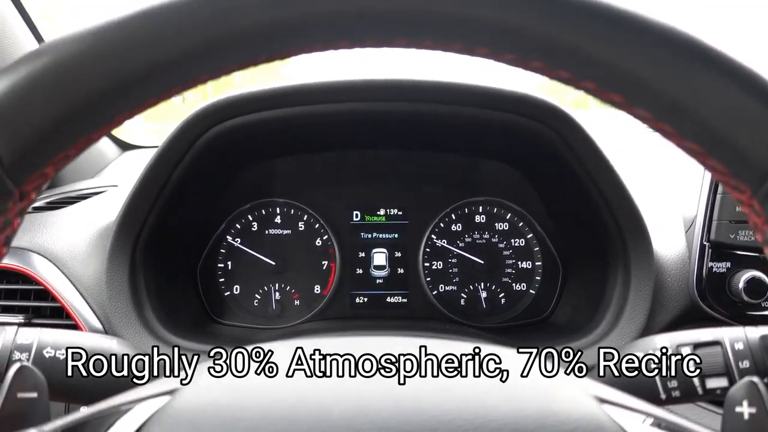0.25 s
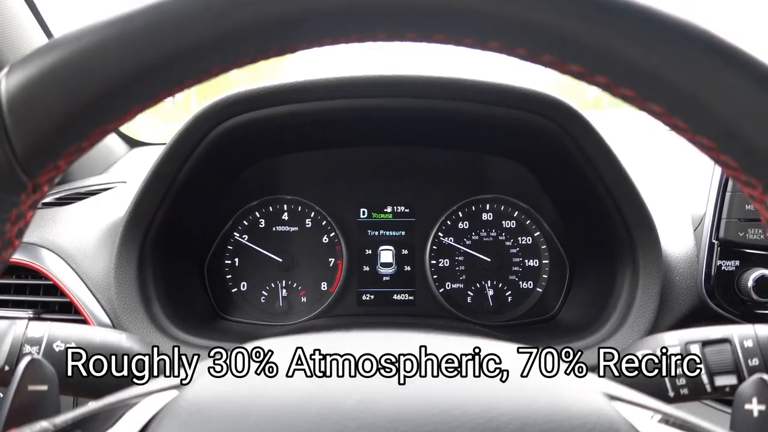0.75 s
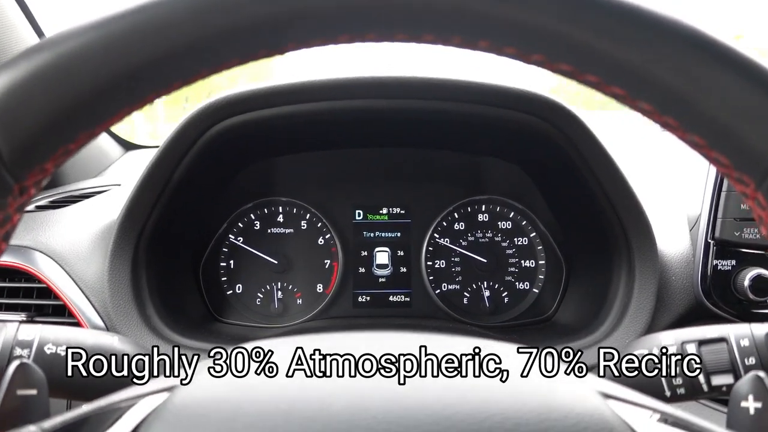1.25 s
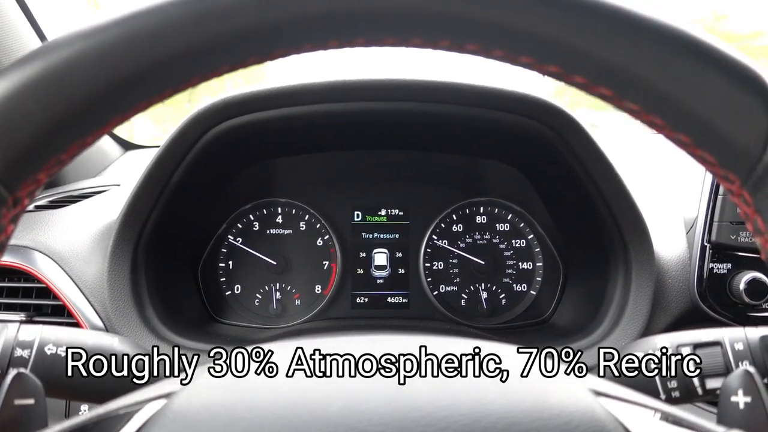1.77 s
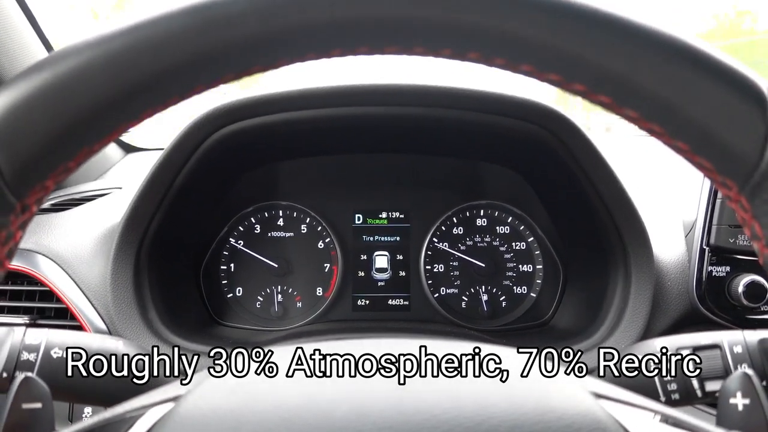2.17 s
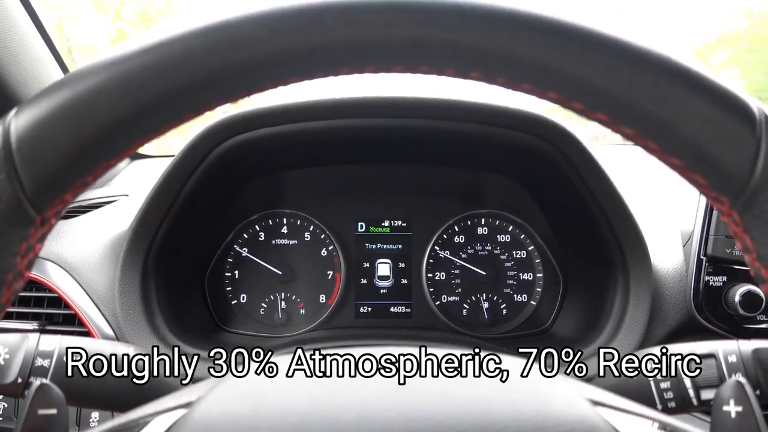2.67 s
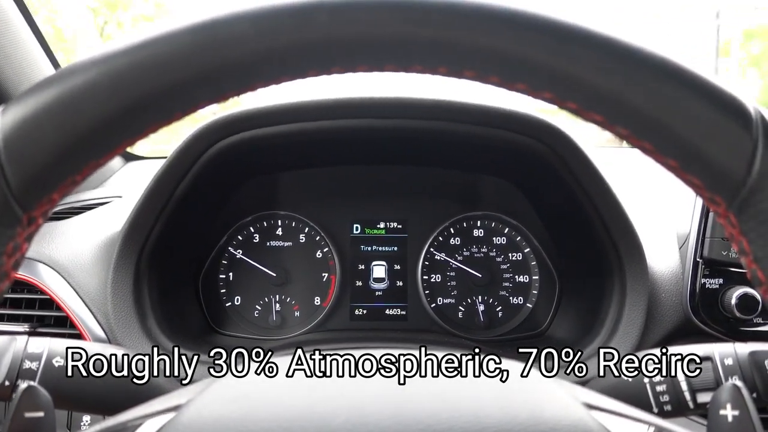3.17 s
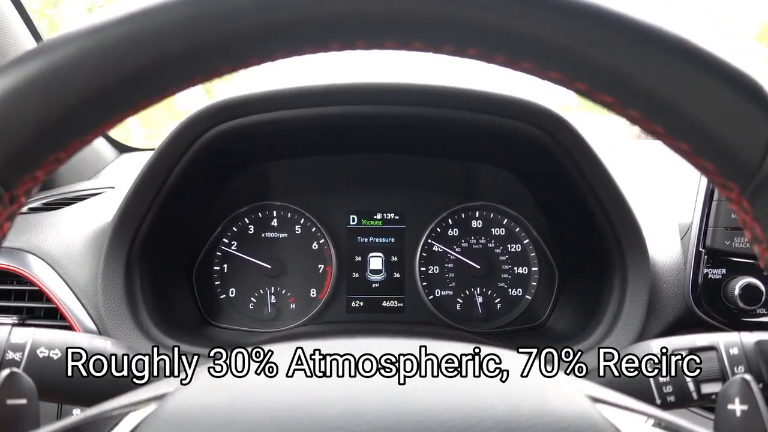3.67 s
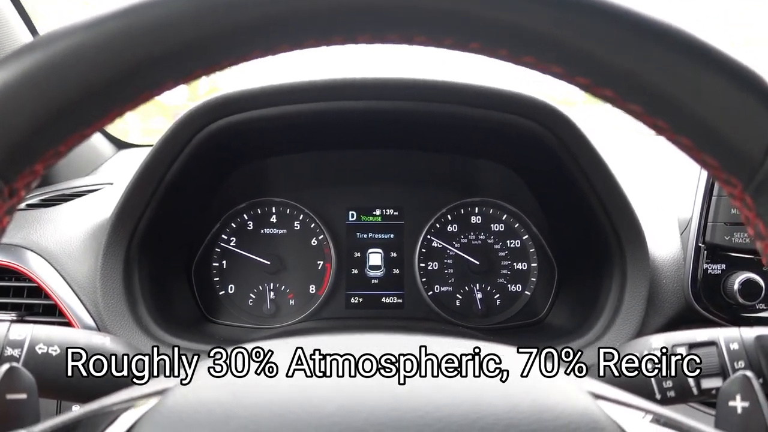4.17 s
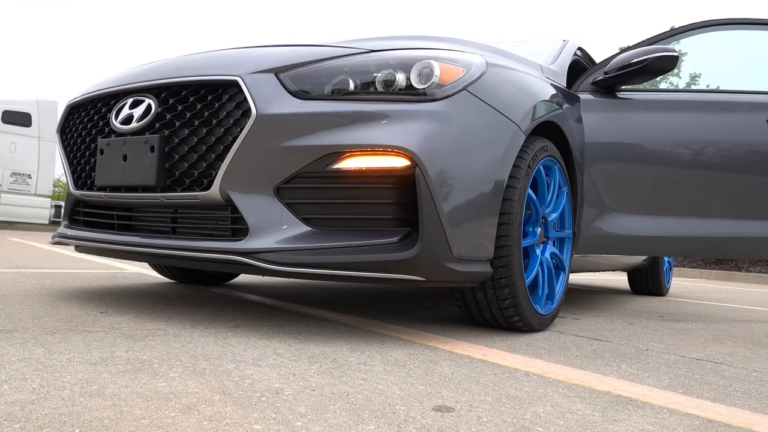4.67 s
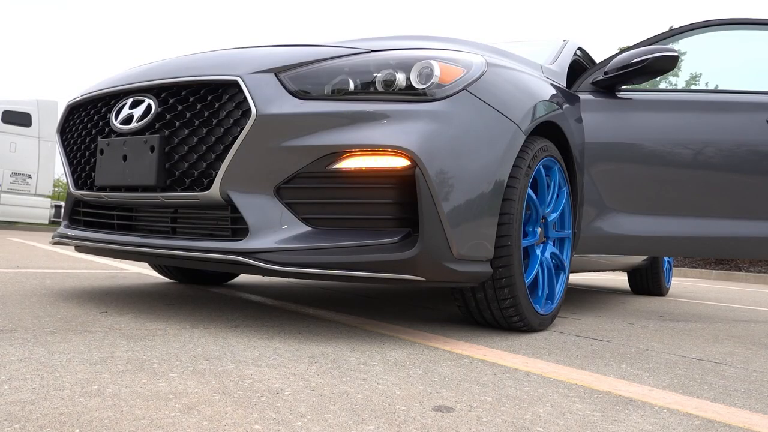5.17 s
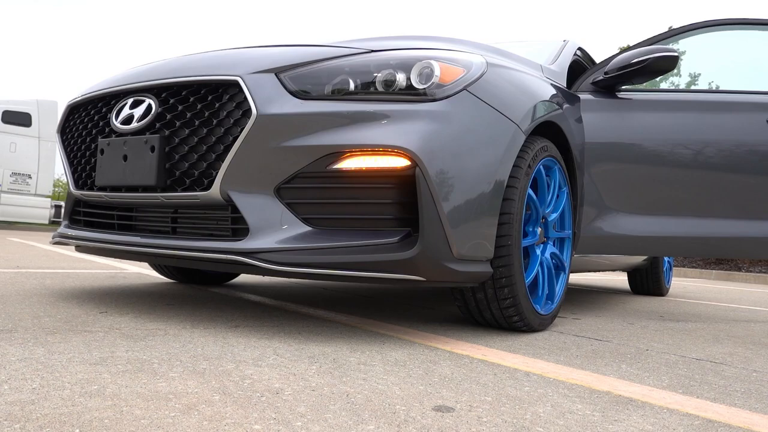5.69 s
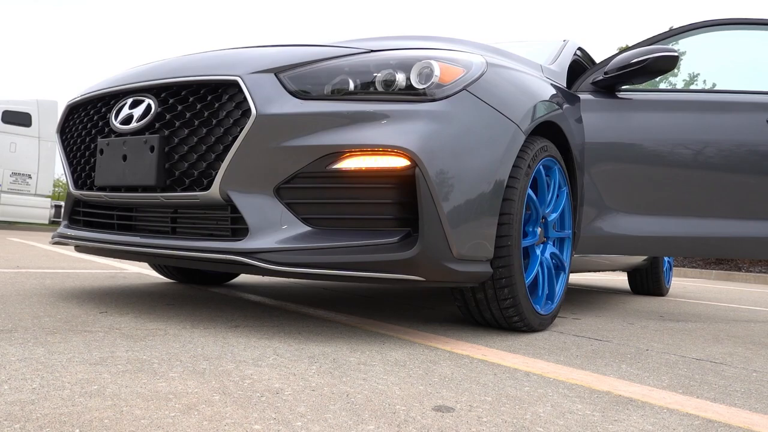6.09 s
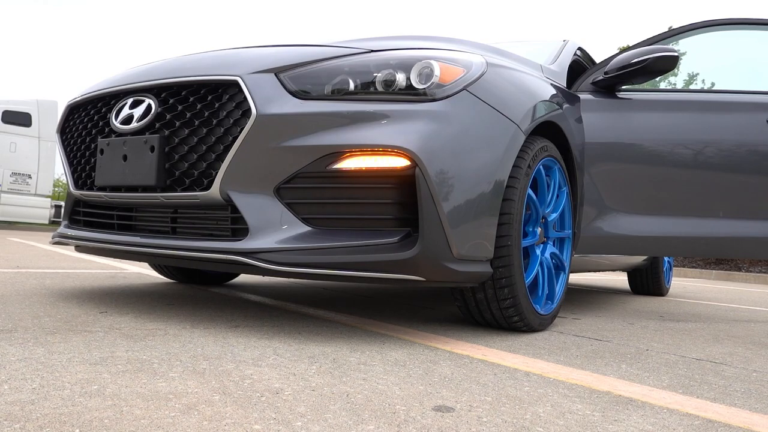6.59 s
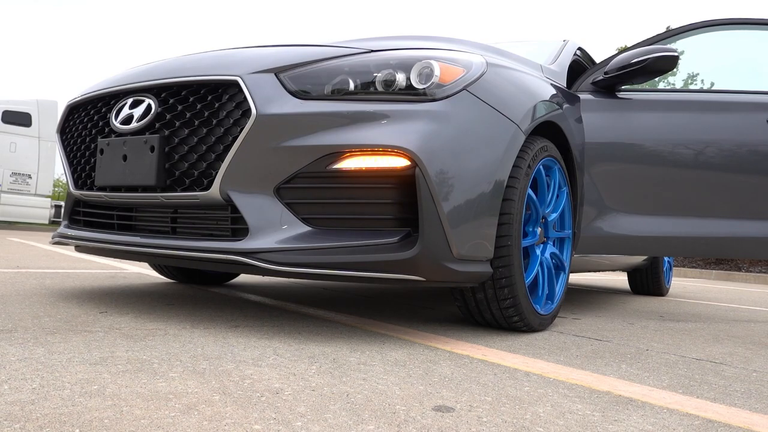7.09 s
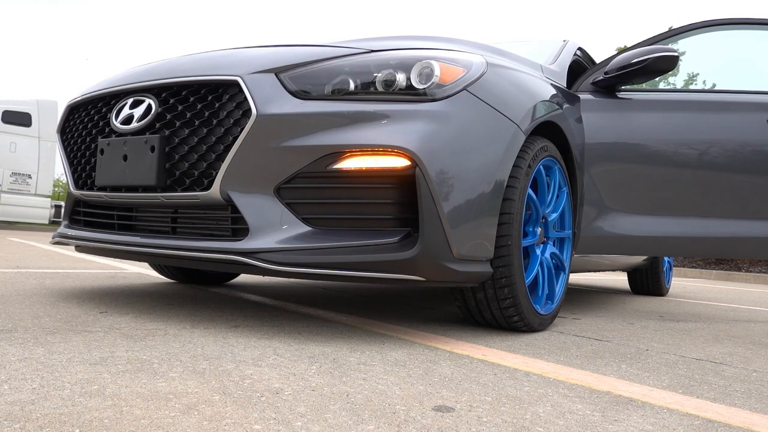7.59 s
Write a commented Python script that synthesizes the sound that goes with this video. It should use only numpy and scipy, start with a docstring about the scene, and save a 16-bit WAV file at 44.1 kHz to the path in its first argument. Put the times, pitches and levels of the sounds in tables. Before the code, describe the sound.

A turbocharged car rumbles along, heard from the cabin, then is blipped twice up close, venting a sharp hiss each time.

```python
"""Low road rumble and bumps fill the cabin of a turbocharged four-cylinder car, with ticking trim and
one muffled blow-off. Then a cut to beside the front bumper: the parked engine winds down and is
blipped twice, its firing tones and roar locked to the crankshaft under a rush of valve gear and a whine.
Each time the throttle shuts, the blow-off valve vents the boost with a loud hiss."""
import sys
import numpy as np
from scipy.fft import rfft, irfft, next_fast_len
from scipy.io import wavfile
from scipy.ndimage import map_coordinates

SR = 44100
rng = np.random.default_rng(int(sys.argv[2]) if len(sys.argv) > 2 else 0)


def wav_record(signal):
    """Record a signal, one row per channel, as 16-bit PCM in the file named by sys.argv[1]."""
    frames = np.transpose(np.atleast_2d(signal))
    bounded = np.clip(frames, -1, 1)
    # unit amplitude maps onto the largest positive 16-bit level
    quanta = np.round(bounded * 32767).astype(np.int16)
    wavfile.write(sys.argv[1], SR, quanta)


N = 345743


def amp(db):
    """Decibels to gain."""
    return 10 ** (np.asarray(db) / 20)

def unit(x):
    """Scale to rms 1."""
    return x / np.sqrt(np.mean(x ** 2) + 1e-20)

def clock():
    """The time of every sample."""
    return np.arange(N) / SR

def ramp(start_s, length_s):
    """A straight fade from 0 to 1."""
    return np.clip((clock() - start_s) / length_s, 0, 1)

def press(start_s, rise_s, end_s, fall_s):
    """Attack, hold and release between 0 and 1."""
    return ramp(start_s, rise_s) * (1 - ramp(end_s, fall_s))

def hump(middle_s, half_length_s):
    """A smooth swell that peaks at 1."""
    return np.exp(-((clock() - middle_s) / half_length_s) ** 2)

def wobble(rate_hz):
    """A smooth random curve through rate_hz points a second."""
    points = rng.standard_normal(int(N * rate_hz / SR) + 4)
    return map_coordinates(points, [np.arange(N) * rate_hz / SR])

def add(track, start_s, sound):
    """Mix a short sound into a track."""
    track[round(start_s * SR):][:len(sound)] += sound

def filtered(x, response):
    """Equalise x with a gain that depends on frequency."""
    size = next_fast_len(N + SR // 2)
    return irfft(rfft(x, size) * response(np.fft.rfftfreq(size, 1 / SR)), size)[:N]

def noise(spectrum, resonances=()):
    """Noise of rms 1, coloured by a (freq_hz, level_db) outline and its resonances."""
    freq_hz, level_db = np.transpose(spectrum)
    def response(hz):
        outline_db = np.interp(np.log(hz + 1e-3), np.log(freq_hz), level_db, left=-120, right=-120)
        lift_db = sum(db / (1 + (2 * (hz - centre) / width) ** 2) for centre, width, db in resonances)
        return amp(outline_db + lift_db)
    return unit(filtered(rng.standard_normal(N), response))

def bursts(rows, spectrum, rise_s):
    """Short puffs of coloured noise, one for each (start_s, level_db, t60_s) row."""
    envelope, age = np.zeros(N), np.arange(SR // 2) / SR
    for start_s, db, t60_s in rows:
        add(envelope, start_s, amp(db - 60 * age / t60_s) * (1 - np.exp(-(age / rise_s) ** 2)))
    return envelope * noise(spectrum)


# colours of the deep boom, the drone, the tyres and the intake: freq_hz, level_db
BOOM_EQ = [(10, -24), (25, 8), (38, -5.5), (50, -2), (70, 0), (88, -11), (130, -45)]
DRONE_EQ = [(60, -26), (100, -4), (116, -6.5), (130, 1), (148, 0), (180, -4.5), (198, -12), (222, -6.5),
            (250, -15), (310, -18.5), (358, -12), (410, -19), (470, -22.5), (700, -38.5)]
TYRE_EQ = [(250, -38), (420, -9), (557, -8.5), (601, -6), (733, -13), (874, -11.5), (1030, -9.5),
           (1170, -10), (1300, -18), (1500, -19), (2600, -37.5), (3380, -54), (5720, -120)]
INTAKE_EQ = [(1180, -32.5), (2000, 0), (2500, -7), (2680, -6), (2890, -7), (4400, -12.5), (6090, -27),
             (8580, -29.5), (13100, -36), (15500, -40)]
# rough stretches of road: middle_s, half_length_s, boom_lift_db
ROUGH_STRETCHES = [(.15, 0.46, 7), (1.198, 0.24, 5), (2.168, 0.23, 7), (3.047, .2, 3.5), (3.853, 0.27, 4.5)]

def road(boom_db=-30.5, drone_db=-27, tyre_db=-42, intake_db=-60.5, pull_db=3):
    """The road shakes the body and cabin air; tyres and intake come through the bulkhead."""
    rough_db = sum(lift * hump(*timing) for *timing, lift in ROUGH_STRETCHES)
    surface = wobble(14)
    boom = amp(boom_db + rough_db + 2 * surface) * noise(BOOM_EQ)
    drone = amp(drone_db + .27 * rough_db + .37 * surface) * noise(DRONE_EQ)
    pedal = press(start_s=1.63, rise_s=.6, end_s=3.55, fall_s=.88)  # one gentle pull
    intake = amp(intake_db + pull_db * pedal) * noise(INTAKE_EQ)
    tyres = amp(tyre_db + .3 * surface) * noise(TYRE_EQ)
    return boom + drone + tyres + intake

# wheels hitting bumps: start_s, swing_db, boom_db, knock_db
BUMPS = [(.038, -6, -15, -37), (0.203, -2.5, -10, -48), (0.978, -10, -6.5, -33), (1.158, -1.5, -10, -35.5),
         (1.898, -25, -14, -54), (2.11, -10, -13, -53), (2.856, -21, -15, -42), (3.068, -7, -28, -52),
         (3.29, -8.5, -28, -55), (3.872, -17, -11.5, -50)]
# the two modes a bump rings, body swing then cabin boom: pitch_hz, t60_s
BODY_MODES = [(43, 0.3), (131, .18)]

def bumps(rise_cycles=.96, thud_db=-17):
    """Each bump sets the body and the cabin air swinging, with a dull thud from the tyre."""
    swing, force, age = np.zeros(N), np.zeros(N), np.arange(SR) / SR
    for start_s, swing_db, boom_db, _ in BUMPS:
        for db, (hz, t60_s) in zip((swing_db, boom_db), BODY_MODES):
            envelope = amp(db - 60 * age / t60_s) * (1 - np.exp(-(age * hz / rise_cycles) ** 2))
            add(swing, start_s, envelope * np.sin(2 * np.pi * hz * age))
            add(force, start_s, envelope)
    thud = noise([(60, -2), (150, 4.5), (300, -10), (800, -21.5), (1600, -43)])
    return swing + amp(thud_db) * force * thud

# hollow knock of a strut: freq_hz, level_db
STRUT_EQ = [(200, -11.5), (400, -1), (650, 10), (900, 0), (1400, -19.5), (2500, -39.5)]

def suspension(t60_s=.11):
    """The suspension knocks on each bump."""
    knocks = [(start_s, knock_db, t60_s) for start_s, _, _, knock_db in BUMPS]
    return bursts(knocks, STRUT_EQ, rise_s=.0036)

# dashboard ticks and creaks: start_s, level_db, t60_s
TRIM_TICKS = [(.2238, -59, .04), (.2932, -54, 0.041), (.6, -58, .04), (1.0, -65.5, .35), (1.3817, -60, .03),
              (3.2958, -62, .04), (3.342, -60, .06)]
# their thin, bright colour: freq_hz, level_db
TRIM_EQ = [(2000, -29.5), (4500, 12), (7000, -5.5), (10500, -2), (15000, -35)]

def trim():
    """The plastic trim ticks faintly."""
    return bursts(TRIM_TICKS, TRIM_EQ, rise_s=.0015)

# valve releases: open_s, rise_s, hold_s, shut_s, hiss_db, jet_db, hiss_tilt_db_per_octave
VENTS = [(3.37, 0.041, 0.14, 4.3, -14.5, -21.5, -1), (5.793, 0.053, .18, 6.289, -15.5, -18.5, -0.5),
         (7.579, 0.022, .23, 7.9, -16, -17.5, 1.1)]
# colours of the pipe's hiss and the brighter jet: freq_hz, level_db
HISS_EQ = [(500, -27), (1000, -4), (1800, -2), (2800, -1.5), (3600, -1), (4500, 0), (5100, -7), (5600, -16),
           (6300, -13), (7500, -34), (12000, -44)]
JET_EQ = [(2500, -19), (4300, 4.5), (5200, 8.5), (5600, 3), (6300, 2.5), (7200, 1.5), (8500, 0.5),
          (10000, 0), (11300, -2), (12300, -9.5), (14000, -10), (15800, -21)]
# ring of the engine bay: centre_hz, width_hz, lift_db
BAY_RESONANCES = [(1500, 26, 6), (1634, 28, -3.5), (2167, 45, 4), (2380, 24, 5.5), (2690, 25, 1.5),
                  (3180, 36, 4.5), (3380, 42, 3.5), (3565, 43, 4.5), (3830, 17, 6), (4155, 54, 4.5),
                  (4390, 62, 6), (4750, 60, 5), (4660, 40, 3.5), (5360, 27, -1.5), (6020, 90, 6),
                  (6500, 51, 6), (7530, 75, 1.5), (9100, 82, 1), (9500, 60, 4.5), (9750, 70, 2.5)]

def blow_off(hiss_sag_db_per_s=37, jet_sag_db_per_s=29, jet_late_db_per_s=23.5, spit_db=2, spit_s=.03):
    """Boost escapes: the jet fades first as pressure falls; the hiss holds, then sags until shut off."""
    out, pivot_hz = np.zeros(N), 3500
    for open_s, rise_s, hold_s, shut_s, hiss_db, jet_db, tilt in VENTS:
        tilted_eq = [(hz, db + tilt * np.log2(hz / pivot_hz)) for hz, db in HISS_EQ]
        gap = press(open_s, rise_s, shut_s, fall_s=.04)
        age = np.maximum(clock() - open_s - rise_s, 0)  # since fully open
        late = np.maximum(clock() - open_s - hold_s, 0)  # since the pressure gave way
        hiss_gain = gap * amp(hiss_db - hiss_sag_db_per_s * late)
        sag_db = jet_sag_db_per_s * age + jet_late_db_per_s * late
        jet_gain = gap ** 3 * amp(jet_db + spit_db * np.exp(-age / spit_s) - sag_db)
        out += hiss_gain * reflections(noise(tilted_eq, BAY_RESONANCES))
        out += jet_gain * reflections(noise(JET_EQ, BAY_RESONANCES))
    return out

def reflections(x, strength=.11, span_s=.014, count=10):
    """Panels under the bonnet and the ground return weak copies, which comb the sound."""
    delays, signs = rng.uniform(.001, span_s, count), rng.choice([-1, 1], count)
    copies = sum(sign * np.pad(x, (int(delay * SR), 0))[:N] for delay, sign in zip(delays, signs))
    return unit(x + strength * copies)

def bulkhead(x, gain_db=-28, muffle_hz=2900, top_hz=12500):
    """The bulkhead weakens and dulls the hiss and takes its top off."""
    dulled = filtered(x, lambda hz: ((1 + (hz / muffle_hz) ** 2) * (1 + (hz / top_hz) ** 10)) ** -.5)
    return amp(gain_db) * dulled


MID_SPEED_HZ = 100  # firing rate from which octaves of engine speed are counted

def follow(octaves, boost, coast_db, octave_db, boost_db):
    """A layer's gain: coast_db at mid speed, lifted by each octave of speed and by boost."""
    return amp(coast_db + octave_db * octaves + boost_db * boost)

# the firing tone through the lowest exhaust resonances: pitch_hz, coast_db
EXHAUST_RESPONSE = [(45, -43.5), (48, -34), (55, -38.5), (71, -32.5), (81, -27.5), (92, -34), (100, -29),
                    (110, -33), (122, -22.5), (132, -22.5)]

def exhaust_note(phase, firing_hz, throttle, load_db=8, lug_power=1.9, burble_db=2):
    """Throttle lifts the burbling firing tone, most when the engine lugs slowly."""
    coast_db = np.interp(firing_hz, *np.transpose(EXHAUST_RESPONSE))
    lug_db = load_db * throttle * (MID_SPEED_HZ / firing_hz) ** lug_power
    return amp(coast_db + lug_db + burble_db * wobble(35)) * np.sqrt(2) * np.sin(phase)

# engine tones at mid speed: firing_multiple, coast_db, full_throttle_db
ORDERS = [(.5, -41.5, -38), (1.5, -43.5, -38), (2, -41, -27), (2.5, -51, -36), (3, -35.5, -24.5),
          (3.5, -52, -32), (4, -52, -31), (4.4, -33, -35), (5, -43.5, -27.5), (6, -40.5, -31),
          (7, -43.5, -36), (8.8, -39.5, -34)]
# pipe resonances they sweep through: pitch_hz, gain_db
PIPE_RESPONSE = [(50, -3.5), (110, -5), (150, -11.5), (210, -1), (260, 1), (320, -0.5), (390, -3),
                 (460, -8), (600, -4), (900, -3.5)]

def engine_orders(phase, firing_hz, throttle, octave_db=4, rough_db=3):
    """An open throttle fills in the orders; they grow with speed and ring in the pipe."""
    out, speed_db = np.zeros(N), octave_db * np.log2(firing_hz / MID_SPEED_HZ)
    for order, coast_db, load_db in ORDERS:
        pipe_db = np.interp(order * firing_hz, *np.transpose(PIPE_RESPONSE))
        db = coast_db + (load_db - coast_db) * throttle + speed_db + pipe_db + rough_db * wobble(28)
        out += amp(db) * np.sqrt(2) * np.sin(order * phase + rng.uniform(0, 2 * np.pi))
    return out

# colours of the combustion roar and the exhaust's bark: freq_hz, level_db
ROAR_EQ = [(60, -14.5), (110, -5.5), (150, -3.5), (230, -4), (330, -4), (450, -6.5), (580, -3), (800, -9.5),
           (1100, -7.5), (1350, -12), (1650, -13.5), (2600, -26), (4000, -48)]
BARK_EQ = [(140, -26), (200, -4), (260, 0), (335, 6), (420, -1.5), (470, -15), (600, -14), (760, -13),
           (950, -20), (1090, -10), (1250, -15), (1700, -34)]

def combustion(phase, octaves, throttle, boost, pulsing=.43, bark_db=-23, bark_octave_db=5):
    """One puff of roar for each firing, pulsing harder under load, when the exhaust also barks."""
    depth = pulsing * (.5 + .5 * throttle)
    puffs = unit(1 + depth * (np.cos(phase) + .25 * np.cos(phase / 2)))
    roar = follow(octaves, boost, coast_db=-27.5, octave_db=7.2, boost_db=7.3) * noise(ROAR_EQ)
    bark = amp(bark_db + bark_octave_db * octaves) * throttle * noise(BARK_EQ)
    return puffs * (roar + bark)

# colour of the mechanical rush: freq_hz, level_db
RUSH_EQ = [(820, -26.5), (1400, -12), (1440, -8), (1700, -12.5), (1860, -4.5), (1970, -11), (2220, -7),
           (2590, -7.5), (4280, -10), (5620, -20), (9490, -23.5), (11500, -27.5), (12700, -35),
           (15500, -37.5)]
# its brief swells: start_s, rise_s, end_s, fall_s, lift_db
RUSH_SWELLS = [(4.4, .04, 5, .03, 3), (5.245, 0.019, 5.31, 0.16, 3.5), (6.48, .05, 6.63, .03, 3.8),
               (6.83, .04, 7.02, .08, 2.6)]

def machinery(octaves, boost):
    """Valve gear, injectors and intake merge into a rush that rings in the engine bay."""
    swell_db = sum(lift * press(*timing) for *timing, lift in RUSH_SWELLS)
    gain = follow(octaves, boost, coast_db=-31.5, octave_db=8.55, boost_db=4.5) * amp(swell_db)
    return gain * reflections(noise(RUSH_EQ, BAY_RESONANCES), strength=.065)

# the whine flares around the blips: middle_s, half_length_s, lift_db
WHINE_FLARES = [(5.303, .08, 5.5), (5.673, .08, 3.5), (7.36, .12, 7)]

def whine(octaves, boost, pitch_hz=1348, wander_hz=19, flutter_db=4):
    """A fluttering tone that grows with effort but keeps its pitch whatever the engine speed."""
    flare_db = sum(lift * hump(*timing) for *timing, lift in WHINE_FLARES)
    gain = follow(octaves, boost, coast_db=-36, octave_db=8.6, boost_db=4) * amp(flare_db)
    phase = 2 * np.pi * np.cumsum(pitch_hz + wander_hz * wobble(110)) / SR
    return gain * unit(amp(flutter_db * wobble(60)) * np.sin(phase))

# sub-bass colour of buffeting air: freq_hz, level_db
BUFFET_EQ = [(4, -4.5), (12, 3.5), (25, -3), (40, -7.5), (80, -25.5), (200, -54), (500, -67.5)]
# stronger gusts: middle_s, half_length_s, level_db
GUSTS = [(5.434, 0.14, -17.5), (5.674, 0.062, -11), (7.101, 0.19, -26), (7.421, 0.062, -12)]

def draught(octaves, boost):
    """Air stirred by the engine thumps softly on the microphone."""
    steady = follow(octaves, boost, coast_db=-34, octave_db=10, boost_db=6)
    gusts = sum(amp(db) * hump(*timing) for *timing, db in GUSTS)
    return np.hypot(steady, gusts) * noise(BUFFET_EQ)

def turbo_whistle(boost, full_boost_db=-50):
    """The compressor whistles faintly as it makes boost."""
    return amp(full_boost_db) * boost ** 2 * noise([(8200, -31.5), (8680, 0), (9100, -25)])

# the rev curve while parked: time_s, firing_hz
REVS = [(4.47, 58.3), (4.73, 51.7), (5.0, 44.62), (5.22, 45.6), (5.33, 48.95), (5.59, 81.7), (5.72, 101.6),
        (5.82, 106.9), (6.19, 97.07), (7.05, 71.22), (7.15, 74.66), (7.51, 126.2), (7.57, 132.6),
        (7.84, 124.9)]
# throttle blips: down_s, rise_s, up_s, fall_s, boost_drain_s, depth (0-1)
BLIPS = [(5.345, 0.1, 5.76, .1, 0.57, 0.69), (7.09, 0.27, 7.55, 0.078, 0.083, 0.83)]

def parked_engine(spool_s=.45, jitter=.009):
    """Each blip opens the throttle and boost follows late; with the revs they drive every layer."""
    firing_hz = np.interp(clock(), *np.transpose(REVS))
    octaves = np.log2(firing_hz / MID_SPEED_HZ)
    throttle = sum(depth * press(down, rise, up, fall) for down, rise, up, fall, _, depth in BLIPS)
    boost = sum(depth * press(down, spool_s, up, drain) for down, _, up, _, drain, depth in BLIPS)
    phase = 2 * np.pi * np.cumsum(firing_hz * (1 + jitter * wobble(40))) / SR  # one turn per firing
    tones = exhaust_note(phase, firing_hz, throttle) + engine_orders(phase, firing_hz, throttle)
    engine = tones + combustion(phase, octaves, throttle, boost) + turbo_whistle(boost)
    return engine + machinery(octaves, boost) + whine(octaves, boost) + draught(octaves, boost)


def scene(cut_s=4.457):
    """The cabin, then a hard cut to the front of the car."""
    hiss = blow_off()
    inside = road() + bumps() + suspension() + trim() + bulkhead(hiss)
    outside = parked_engine() + hiss
    cut = ramp(cut_s, .005)
    return ((1 - cut) * inside + cut * outside)[None]

def record(dry, ceiling=.88, top_hz=15800):
    """A soft clip rounds the highest peaks, then a brick-wall low-pass trims the top."""
    rounded = dry / (1 + np.abs(dry / ceiling) ** 6) ** (1 / 6)
    return filtered(rounded[0], lambda hz: hz < top_hz)[None]


dry = scene()
out = record(dry)
wav_record(out)
```